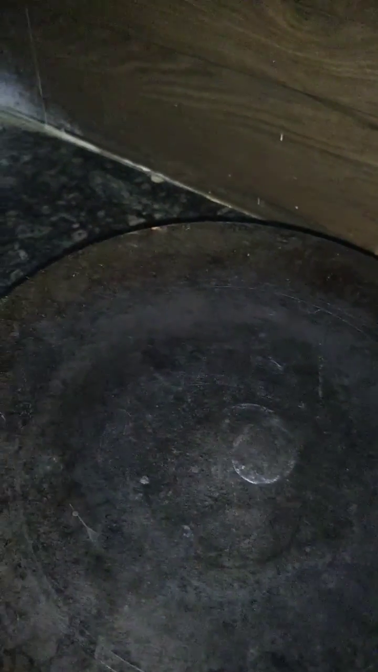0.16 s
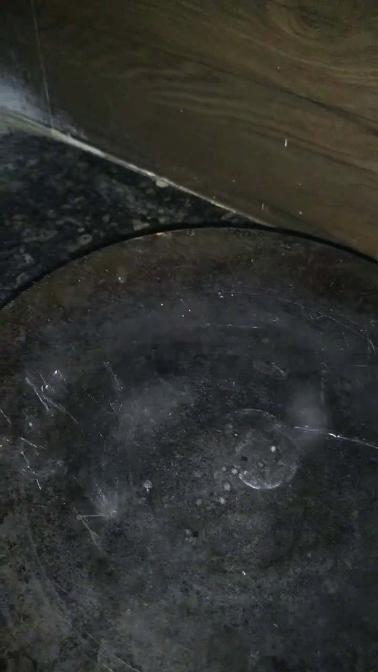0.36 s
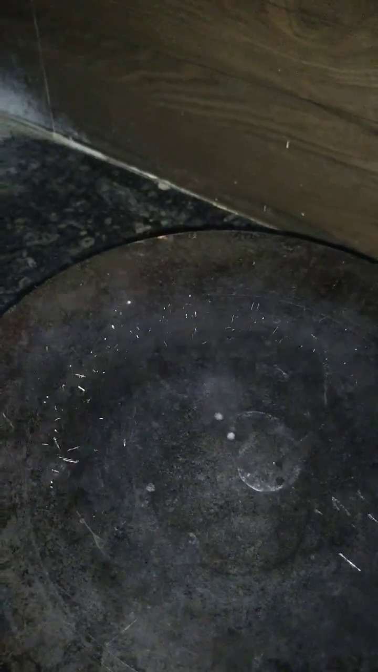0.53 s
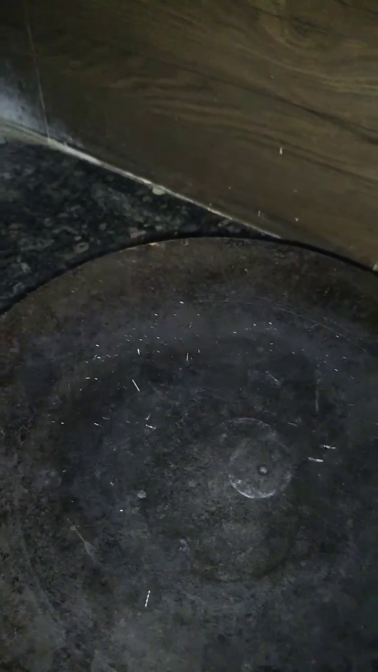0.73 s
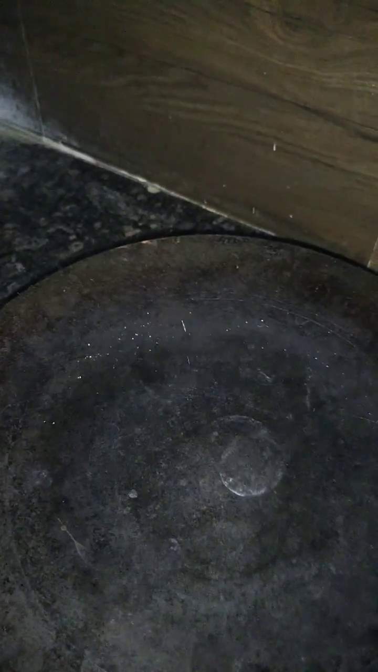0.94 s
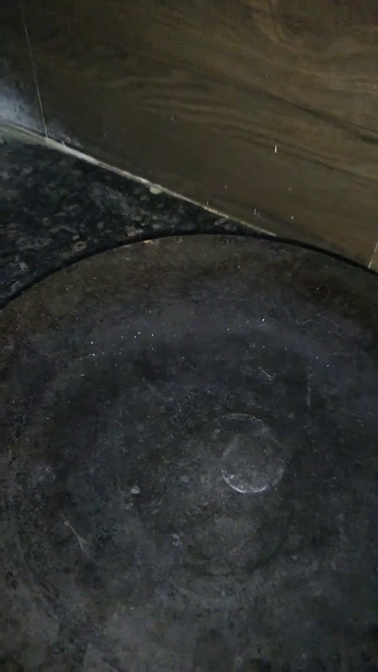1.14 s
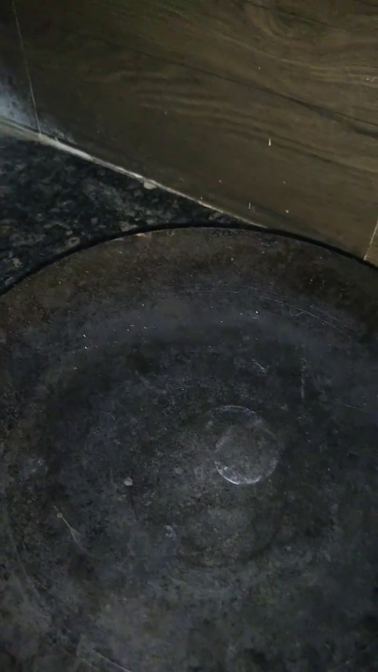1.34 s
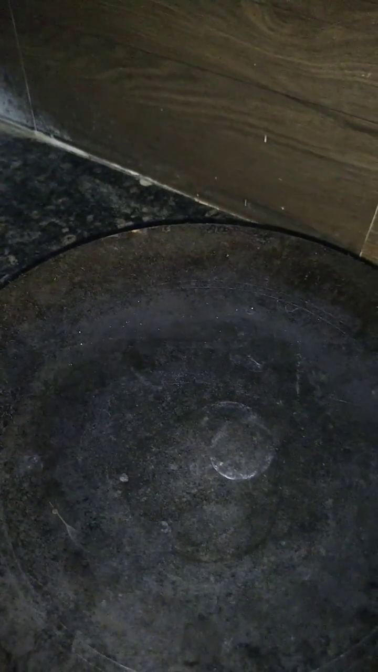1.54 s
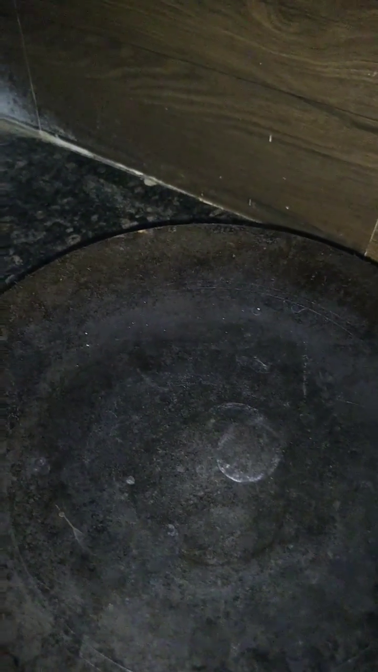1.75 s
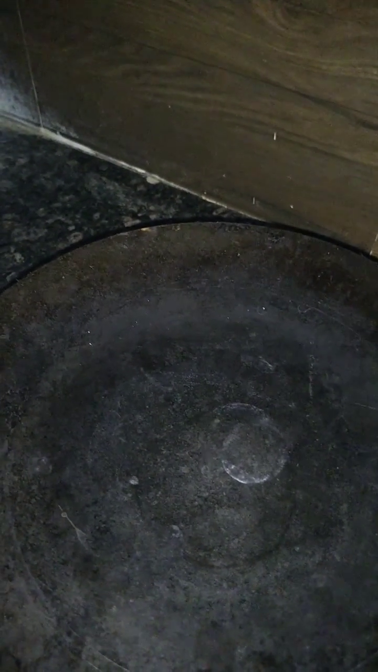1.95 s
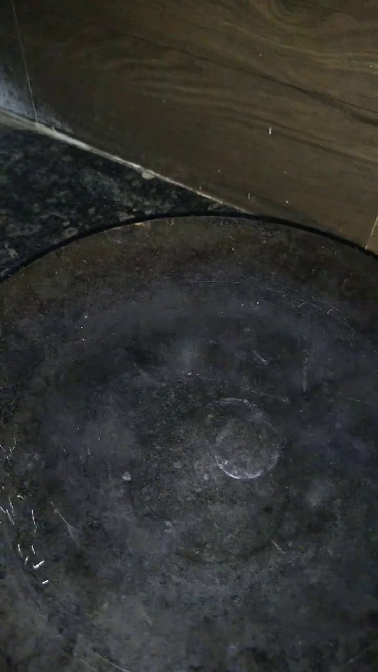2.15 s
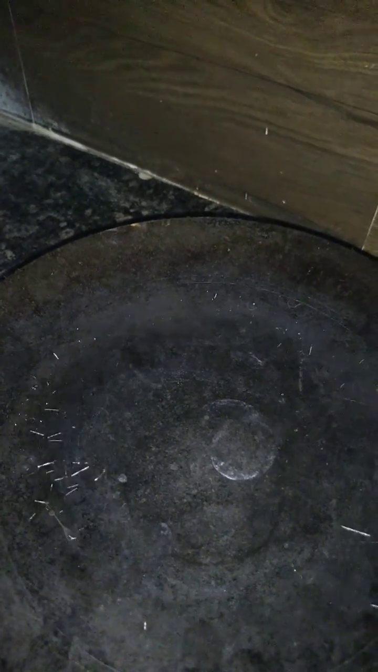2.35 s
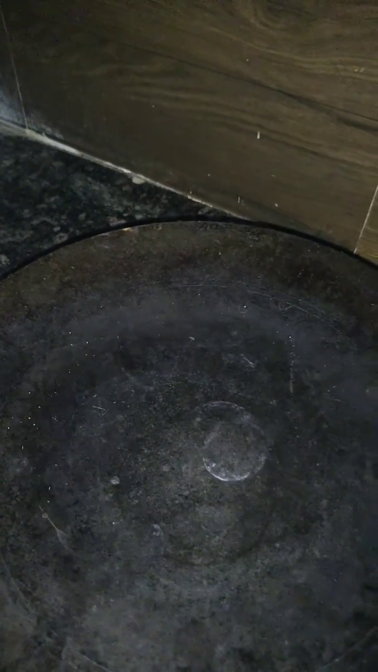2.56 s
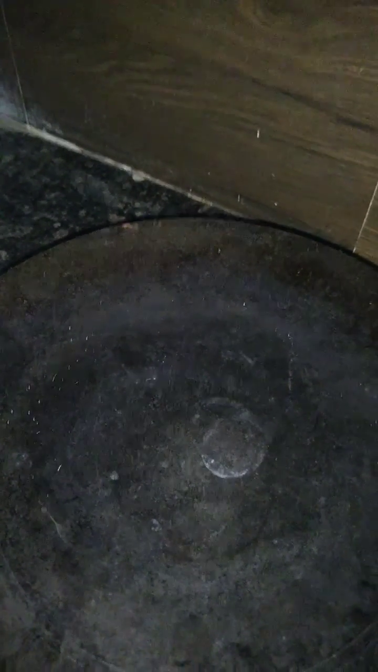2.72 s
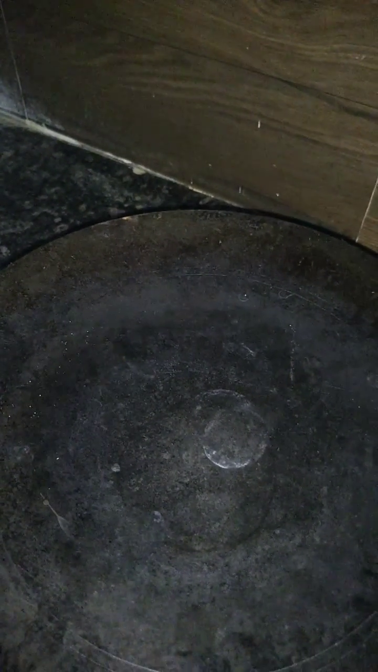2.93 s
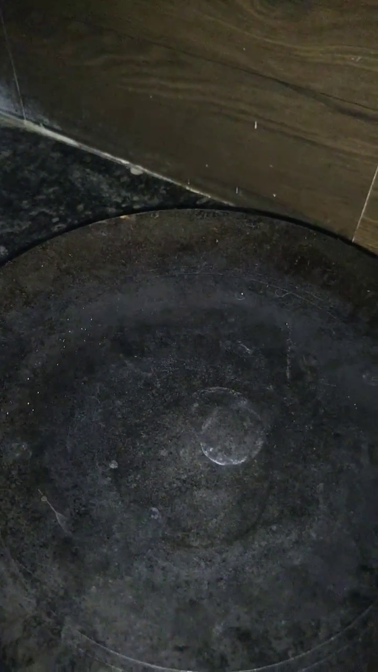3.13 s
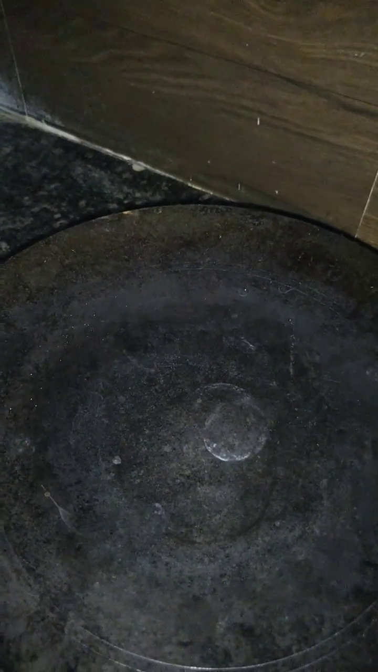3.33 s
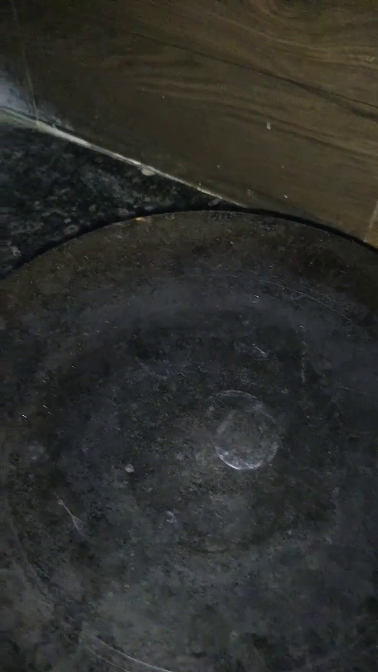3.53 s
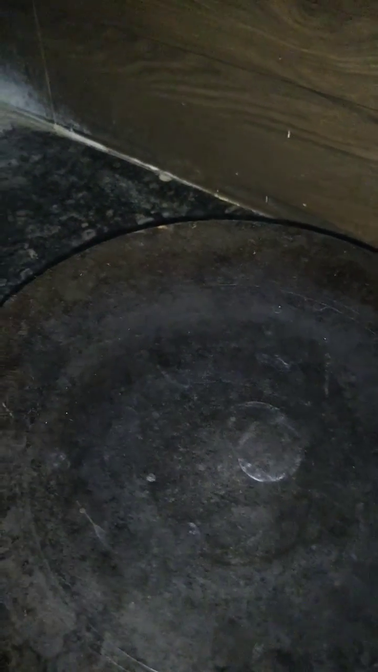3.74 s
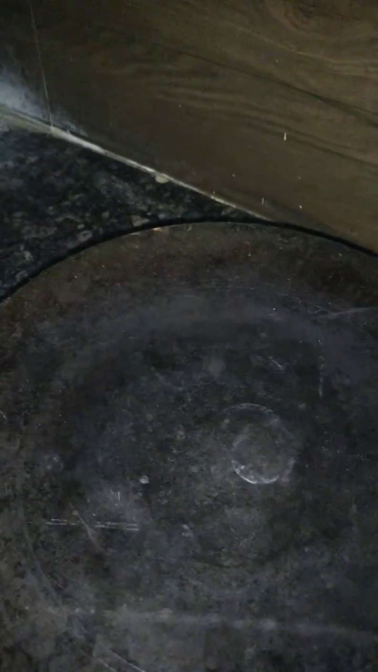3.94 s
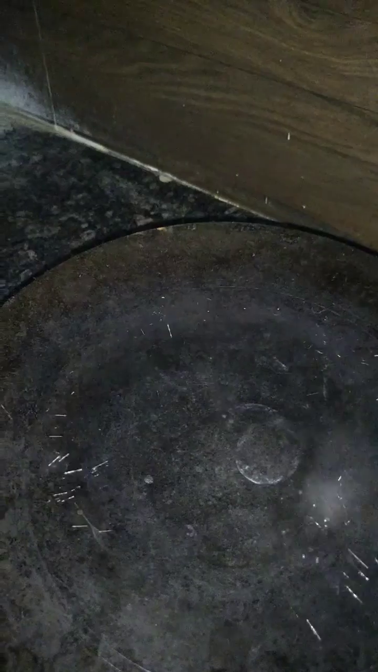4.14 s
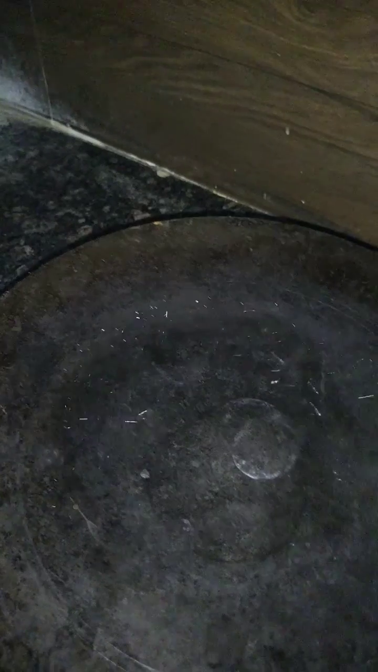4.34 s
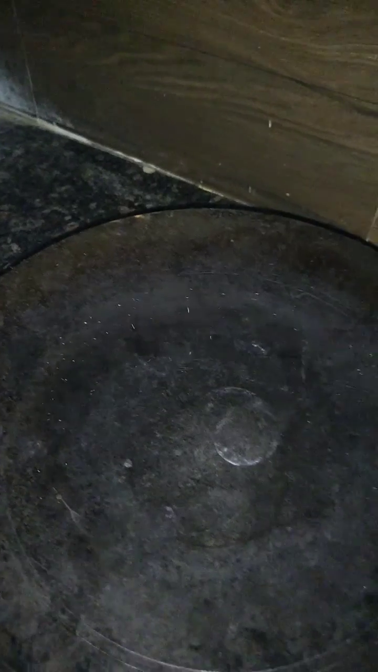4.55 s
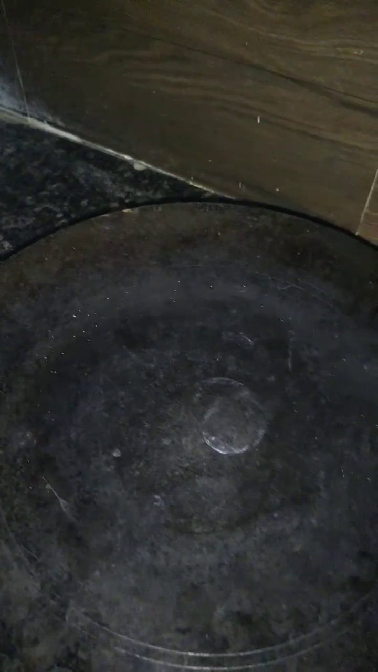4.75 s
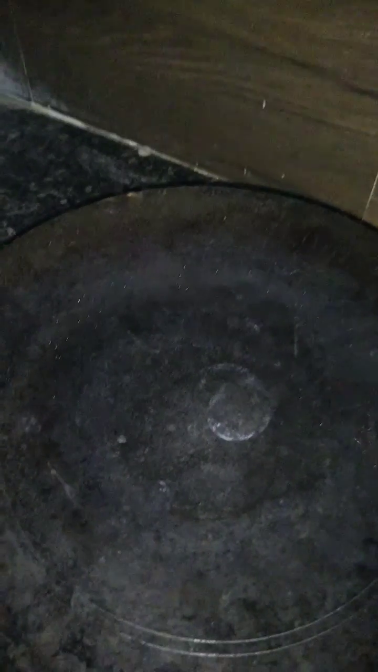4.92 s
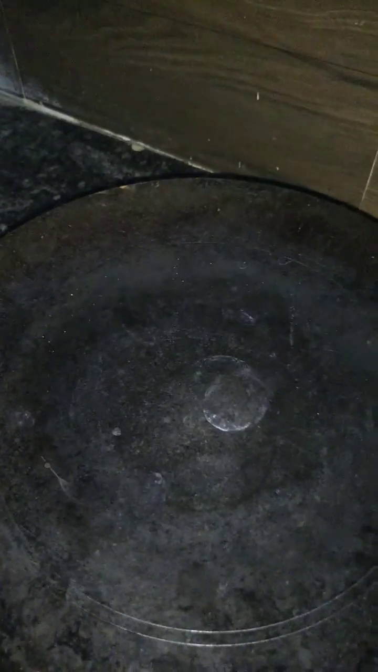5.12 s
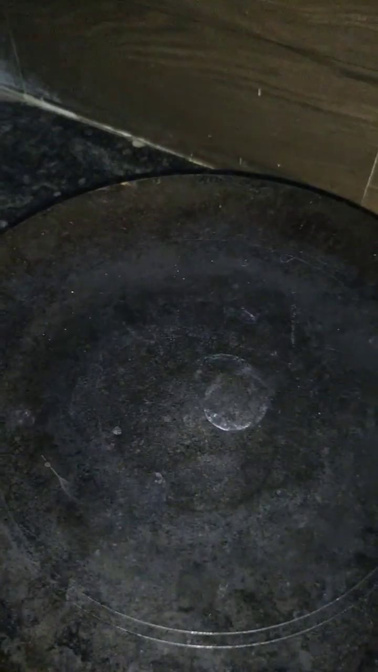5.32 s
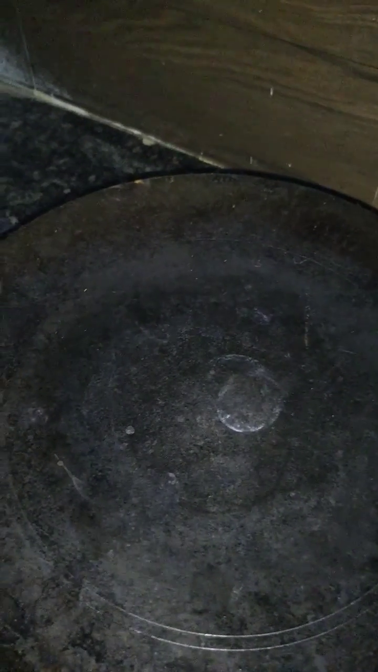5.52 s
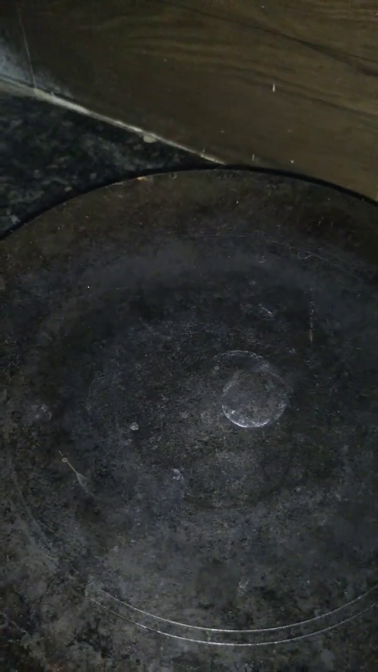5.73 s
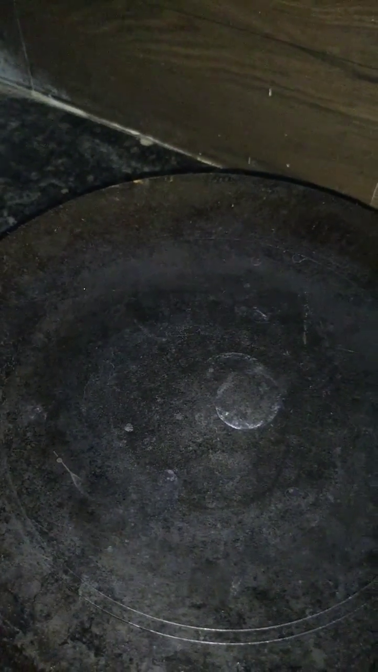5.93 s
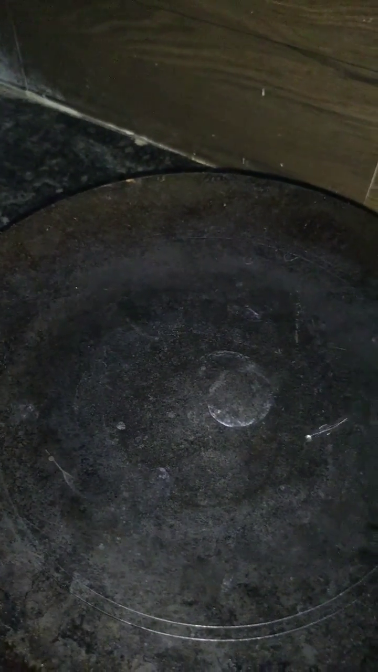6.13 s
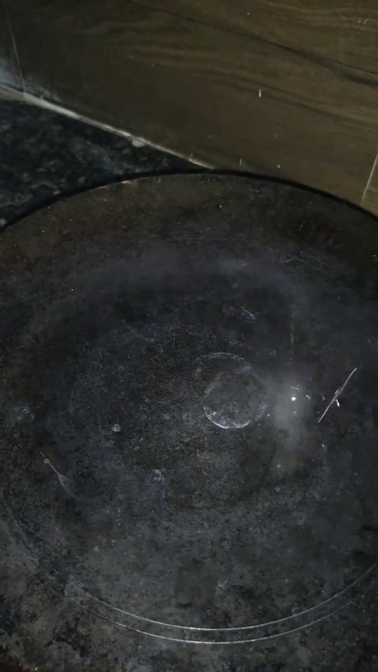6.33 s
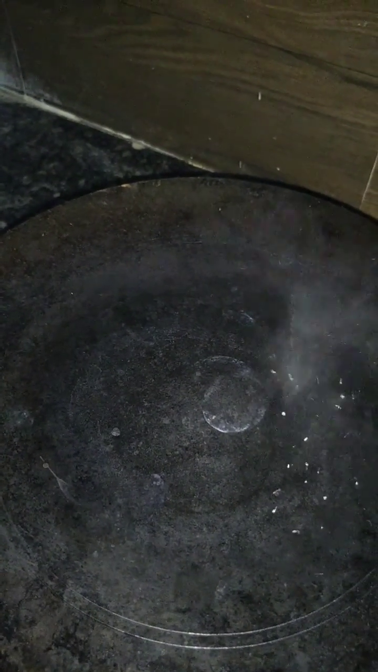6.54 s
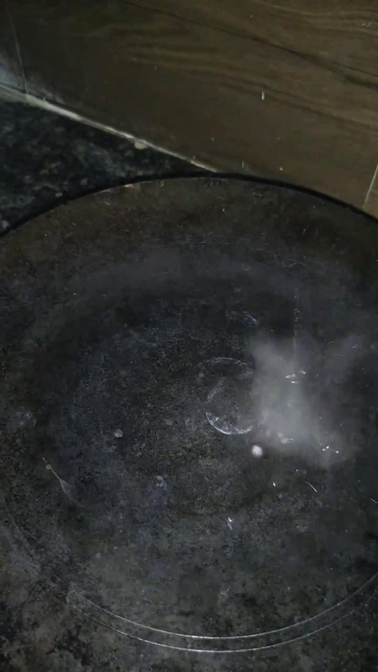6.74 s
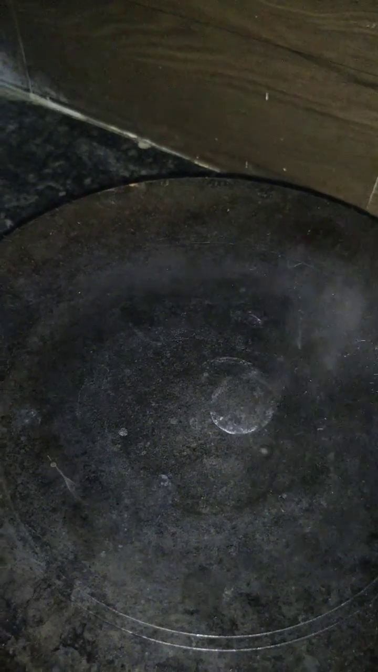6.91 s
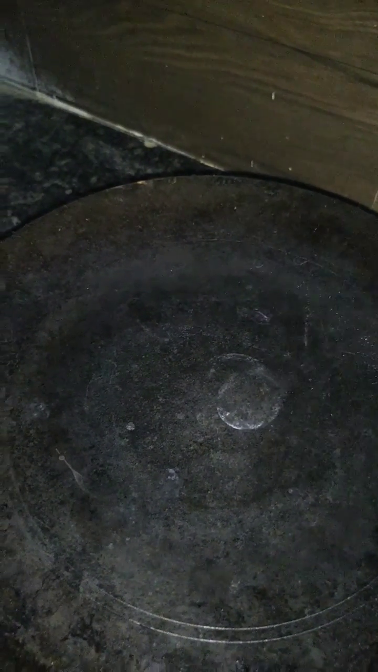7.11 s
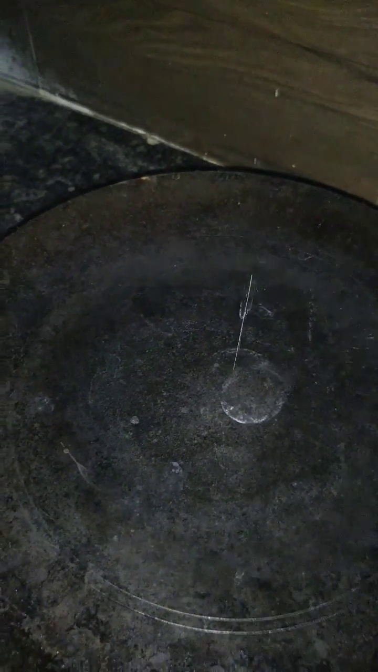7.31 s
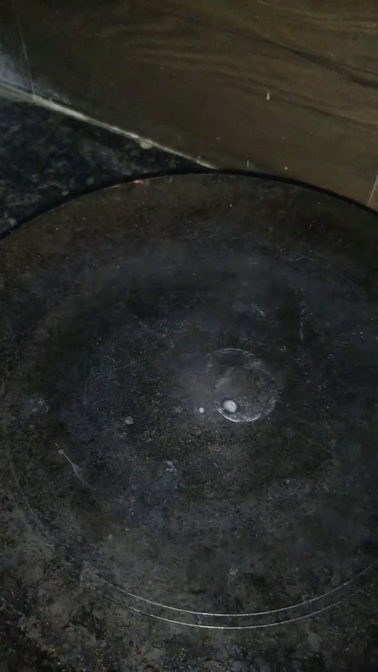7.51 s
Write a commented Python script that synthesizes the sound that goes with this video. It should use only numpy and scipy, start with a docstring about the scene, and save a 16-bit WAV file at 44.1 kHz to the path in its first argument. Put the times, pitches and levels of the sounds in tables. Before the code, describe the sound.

A faint motor hum and soft, dull pats, about six a second, run throughout in a small kitchen. At 0.4 seconds water lands on a very hot flat pan close by with a soft slap and flashes into a sharp, dense sizzle, thinning to single spits by 1.5 seconds. A second, shorter spray hits at 2.2 seconds, flares again at 2.5 and crackles away, with a soft, low boom from the pan at 2.7. A third lands at about 4.1 seconds with another low boom, sizzles strongly and dries to stray ticks after 5 seconds. Between the sizzles the background sinks very low. At 6.3, 6.5 and 6.8 seconds dollops of water drop on the pan, each bursting into a bright, sputtering hiss that fades quickly. A fourth, weaker one sizzles at about 7.5 seconds.

```python
"""A motor hums in a small kitchen and something pats softly about six times a second. Water is flicked
onto a very hot flat pan three times: each spray lands with a soft slap, flashes into a dense sizzle of
tiny steam bursts and thins to single spits as it boils away. Twice the jolted pan booms low. From 6.3 s
four dollops drop and boil on one spot. Between sizzles a noise suppressor turns the kitchen down."""
import sys
import numpy as np
from scipy import signal
from scipy.fft import rfft, irfft, next_fast_len
from scipy.io import wavfile
from scipy.ndimage import map_coordinates

SR = 44100
rng = np.random.default_rng(int(sys.argv[2]) if len(sys.argv) > 2 else 0)


def dump_mix(stems):
    """Bounce the given channels to the path in sys.argv[1] as a 16-bit WAV at rate SR."""
    frames = np.atleast_2d(stems).T  # one column per channel
    limited = np.clip(frames, -1, 1)  # hard clip at full scale
    pcm = np.round(limited * 32767).astype(np.int16)
    wavfile.write(sys.argv[1], SR, pcm)


N = 338247


def amp(db):
    """Gain of a level in dB."""
    return 10 ** (np.asarray(db) / 20)


def unit(x):
    """x at rms 1."""
    return x / np.sqrt(np.mean(x ** 2) + 1e-20)


def along(points, hz):
    """(freq_hz, value) points interpolated on a log axis."""
    freqs_hz, values = np.transpose(points)
    return np.interp(np.log(hz + 1), np.log(freqs_hz + 1), values)


def clock():
    """Sample times in seconds."""
    return np.arange(N) / SR


def wobble(rate_hz):
    """Smooth random curve, rate_hz knots a second."""
    knots = rng.standard_normal(int(N * rate_hz / SR) + 4)
    return map_coordinates(knots, [np.arange(N) * rate_hz / SR])


def filtered(x, response):
    """x through a zero-phase gain, response(hz)."""
    size = next_fast_len(len(x) + SR // 4)
    return irfft(rfft(x, size) * response(np.fft.rfftfreq(size, 1 / SR)), size)[:len(x)]


def coloured(x, spectrum_db):
    """White x given a spectrum, power kept."""
    return filtered(x, lambda hz: unit(amp(spectrum_db(hz))))


def noise(points):
    """Noise of rms 1 with a (freq_hz, level_db) spectrum."""
    return unit(coloured(rng.standard_normal(N), lambda hz: along(points, hz)))


def peak(hz, centre_hz, width_hz):
    """Resonance curve of height 1."""
    return 1 / (1 + (2 * (hz - centre_hz) / width_hz) ** 2)


def band_noise(centre_hz, width_hz):
    """Noise of rms 1 in one resonant band."""
    return unit(filtered(rng.standard_normal(N), lambda hz: peak(hz, centre_hz, width_hz)))


def highpass(x, split_hz):
    """The part of x above split_hz."""
    return filtered(x, lambda hz: 1 - 1 / (1 + (hz / split_hz) ** 8))


def smoothed(x, tau_s):
    """One-pole running mean."""
    keep = np.exp(-1 / (tau_s * SR))
    return signal.lfilter([1 - keep], [1, -keep], x)


def swell(start_s, rise_s, t60_s):
    """Linear rise to 1, exponential decay."""
    age_s = clock() - start_s
    return np.clip(age_s / rise_s, 0, 1) * np.exp(-np.log(1000) * np.maximum(age_s - rise_s, 0) / t60_s)


# freq_hz, level_db
RUSH_SPECTRUM = [(15, -49.5), (25, -22), (69, -5.5), (155, -1), (188, -7.5), (240, -14), (337, -9),
                 (618, -18), (934, -19), (1160, -23), (2080, -20.5), (2930, -26), (6070, -31), (7550, -32),
                 (8320, -46), (10800, -69), (18300, -120)]
def room_rush():
    """The kitchen's steady rush."""
    return amp(-60.5 + 0.82 * wobble(2.5)) * noise(RUSH_SPECTRUM)


# pitch_hz, relative_db, width_hz, drift_db_per_s
HUM_PARTIALS = [(53.7, -85.5, 2.9, 1.5), (75.6, -72.5, 1.3, 2.5), (99.4, -70.5, 0.71, 0),
                (137.4, -72.5, 7.4, -2.5), (157.7, -68, 16, 1.5), (173, -65.5, 8, 0.4),
                (337, -77.5, 13, 2.5), (1980, -93, 4.8, 0.5), (1980, -87, 59, 0.5), (2110, -82, 120, 0.5)]
def motor_hum():
    """A wavering motor hum whose partials slowly trade strength."""
    t, hum = clock(), np.zeros(N)
    for hz, db, width_hz, drift_db_per_s in HUM_PARTIALS:
        phase = 2 * np.pi * hz * t
        in_phase = (1 + 0.53 * wobble(2 * width_hz)) * np.sin(phase)
        quadrature = 0.74 * wobble(2 * width_hz) * np.cos(phase)
        hum += amp(db + drift_db_per_s * (t - t.mean())) * (in_phase + quadrature)
    return amp(3.5 + 1.06 * wobble(3)) * hum


# start_s, level_db
BUMP_EVENTS = [(0.02, -54), (2.18, -47.5), (2.319, -59), (5.84, -53.5), (6.47, -46.5)]
def bumps():
    """Occasional soft swells of rumble."""
    rumble = noise([(20, -23.5), (50, 0.5), (85, 3), (140, -24), (300, -55.5)])
    return rumble * sum(amp(db) * swell(s, rise_s=0.03, t60_s=0.46) for s, db in BUMP_EVENTS)


# freq_hz, level_db
PAT_SPECTRUM = [(150, -24.5), (300, -4.5), (430, 3.5), (620, -6.5), (780, -4), (1100, -13.5), (1800, -13),
                (3000, -27), (8000, -42.5)]
# start_s, beat_s
PAT_STRETCHES = [(0.082, .126), (0.72, .144), (1.433, .159), (2.715, .177), (3.639, .17), (4.633, .153),
                 (5.322, .152), (5.788, .197)]
def pats():
    """Faint, dull pats; the pace changes stretch by stretch."""
    ends_s = [s for s, _ in PAT_STRETCHES[1:]] + [N / SR]
    times_s = np.concatenate([np.arange(s, end_s - beat_s / 2, beat_s)
                              for (s, beat_s), end_s in zip(PAT_STRETCHES, ends_s)])
    envelope = sum(swell(s, rise_s=0.005, t60_s=0.19) for s in times_s)
    return amp(-56.5 + 0.9 * wobble(6)) * envelope * noise(PAT_SPECTRUM)


# pitch_hz, relative_db, t60_s
IRON_MODES = [(1972, -10.5, 0.066), (2462, -2, 0.078), (2610, -7.5, 0.11)]
def iron_ring(kicks):
    """The plate rings briefly after each kick."""
    t = clock()
    ring = sum(amp(db) * swell(0, 0.0015, t60_s) * np.sin(2 * np.pi * hz * t)
               for hz, db, t60_s in IRON_MODES)
    return signal.fftconvolve(kicks, ring)[:N]


# start_s, tick_db, pop_offset_db
SPIT_EVENTS = [(0.377, -38.5, -12.5), (0.423, -41, -4.5), (1.229, -43.5, -11), (1.489, -48, -7),
               (1.511, -47, -11), (1.5637, -47.5, -13), (1.5985, -49.5, -5), (1.687, -53, -6.5),
               (2.1155, -45.5, -6.5), (2.7871, -34, -24), (3.04, -49, -5), (3.2096, -37, -24),
               (3.978, -52.5, -0.5), (4.999, -45.5, -11), (5.218, -47.5, -15.5), (5.304, -52, -6.5),
               (5.488, -47, -12), (5.8, -47.5, -27), (5.8275, -49.5, -16), (7.3607, -43.5, -12)]
def spits():
    """Stray droplets burst singly: a high tick and a lower pop that rings the iron."""
    pop, tick, kicks = np.zeros((3, N))
    for start_s, tick_db, pop_offset_db in SPIT_EVENTS:
        pop_gain = amp(tick_db + pop_offset_db)
        pop += pop_gain * swell(start_s, rise_s=0.00079, t60_s=0.028)
        tick += amp(tick_db) * swell(start_s, rise_s=0.0005, t60_s=0.016)
        kicks[round(start_s * SR)] += pop_gain
    pop_noise = noise([(700, -43), (1600, -8), (2200, -2.5), (3600, -2.5), (8000, -30)])
    tick_noise = noise([(1500, -41.5), (3600, -8.5), (6000, -3.5), (7600, 1), (9000, -2.5)])
    return amp(1) * pop * pop_noise + tick * tick_noise + amp(-6.5) * iron_ring(kicks)


def boiling(splashes):
    """Boil strength and brightness: a splash flashes to steam, sags while its water lasts, then dries."""
    t, power, bright_db = clock(), np.zeros(N), np.zeros(N)
    sag_db_per_s = 14
    for start_s, boil_db, flash_db, rise_s, hold_s, drying_db_per_s, tone_db in splashes:
        age_s = np.maximum(t - start_s, 0)
        loss_db = sag_db_per_s * np.minimum(age_s, hold_s)
        loss_db += drying_db_per_s * np.maximum(age_s - hold_s, 0)
        flash = amp(flash_db) * swell(start_s, rise_s=0.0043, t60_s=0.2)
        power += np.minimum(age_s / rise_s, 1) * amp(boil_db - loss_db) ** 2 + flash ** 2
        bright_db[t >= start_s] = tone_db
    return np.sqrt(power), bright_db


def steam_bursts(rate_hz, spread_db, life_s):
    """Tiny puffs of steam, random in time and size; mean power 1."""
    energy = amp(spread_db * np.clip(rng.standard_normal(N), -2, 2)) ** 2
    chance = np.minimum(rate_hz / SR, 1)
    puffs = (rng.random(N) < chance) * energy / energy.mean() / chance
    return np.sqrt(smoothed(puffs, life_s)) * rng.standard_normal(N)


def sputter(boil, rate_hz=320, pitch_hz=2406, decay_cycles=5.7, spread_db=2.5):
    """Bigger drops burst as short pitched pops that kick the plate; same rms as boil."""
    onsets = np.flatnonzero((rng.random(N) < rate_hz / SR) & (boil > amp(-80)))
    detune, size = rng.standard_normal((len(onsets), 2)).T
    hz = np.clip(pitch_hz * np.exp(0.11 * detune), 1900, 7500)[:, None]
    gain = boil[onsets] * amp(spread_db * np.clip(size, -2, 1.5))
    age_samples = np.arange(SR // 50)
    cycles = hz * age_samples / SR
    grains = gain[:, None] * np.sin(2 * np.pi * cycles) * np.exp(-cycles / decay_cycles)
    pops = np.bincount((onsets[:, None] + age_samples).ravel(), grains.ravel(), N)[:N]
    ring = amp(-12.5) * iron_ring(np.bincount(onsets, gain, N))
    return unit(pops + ring) * np.sqrt(np.mean(boil ** 2))


# freq_hz, level_db
STEAM_SPECTRUM = [(53, -41.5), (90, -15), (168, -1), (236, -23.5), (450, -9), (645, -12.5), (1230, -16.5),
                  (1480, -9.5), (2170, -5), (3110, -2), (3830, 0), (4800, -6.5), (7290, -8.5), (7710, -9.5),
                  (8320, -6), (10800, -72), (18300, -120)]
def sizzle(steady_boil, bright_db, ridges, boil_rate_hz, flutter_db, coarse_db, fine_db):
    """More boiling gives denser bursts; on drying, the hiss breaks up into crackle."""
    def spectrum_db(hz):
        ridges_db = sum(db * peak(hz, centre_hz, width_hz) for centre_hz, width_hz, db in ridges)
        return along(STEAM_SPECTRUM, hz) + ridges_db

    boil = steady_boil * amp(flutter_db * wobble(35))
    rate_hz = 110 + boil_rate_hz * (boil / boil.max()) ** 1.3
    crackle = steam_bursts(rate_hz, spread_db=3.5, life_s=0.0028)
    steam = amp(-1.22) * crackle + amp(-9.5) * rng.standard_normal(N)
    hiss = coloured(boil * steam, spectrum_db)
    fine = highpass(hiss, split_hz=4150)  # small bubbles
    return amp(coarse_db) * (hiss - fine) + amp(bright_db + fine_db) * fine + amp(-12.5) * sputter(boil)


# start_s, boil_db, flash_db, rise_s, hold_s, drying_db_per_s, tone_db
SPRAY_SPLASHES = [(0.427, -36, -47.5, 0.045, 0.55, 46.5, -7), (2.164, -36, -40.5, 0.034, 0.18, 51.5, -6),
                  (4.058, -34.5, -39, 0.15, 0.46, 44.5, -5.5)]
# centre_hz, width_hz, gain_db
SPRAY_COLOUR = [(1518, 55, 6), (2183, 160, 5.5), (2590, 86, 5.5), (3700, 900, 1), (7120, 200, 6)]
def sprays():
    """Flicked water boils, scattered over the pan."""
    boil, bright_db = boiling(SPRAY_SPLASHES)
    return sizzle(np.hypot(boil, surges()), bright_db, SPRAY_COLOUR,
                  boil_rate_hz=6000, flutter_db=0.93, coarse_db=-1.06, fine_db=7.5)


# start_s, level_db, rise_s, t60_s
SLAP_EVENTS = [(0.433, -40, 0.037, 0.13), (2.163, -41, 0.024, 0.21), (4.058, -45, .012, 0.37),
               (6.482, -52.5, .008, .35), (6.788, -53, 0.011, 0.39)]
# freq_hz, level_db
SLAP_SPECTRUM = [(30, -37), (70, -9), (150, -6.5), (260, -16), (430, -7.5), (650, -19), (1000, -41.5),
                 (2500, -60)]
def slaps():
    """The water's weight lands on the plate with a dull splat."""
    envelope = sum(amp(db) * swell(s, rise_s, t60_s) for s, db, rise_s, t60_s in SLAP_EVENTS)
    return envelope * noise(SLAP_SPECTRUM)


# start_s, boil_db, t60_s
SURGE_EVENTS = [(0.544, -32, .25), (0.888, -49.5, 0.17), (1.079, -47.5, 0.14), (2.524, -43.5, 1.6),
                (2.749, -52.5, 0.2), (2.866, -52, 0.21), (4.15, -41, 0.17), (4.48, -42.5, 0.15),
                (4.867, -44.5, .1), (7.439, -54.5, 0.075)]
def surges(rise_s=0.0051):
    """Extra boil strength where a skating drop touches the iron again."""
    return sum(amp(db) * swell(s, rise_s, t60_s) for s, db, t60_s in SURGE_EVENTS)


# start_s, level_db, pitch_hz, width_hz, t60_s
FLARE_EVENTS = [(0.699, -42, 2560, 300, 0.2), (2.53, -42, 2370, 600, 0.16), (4.155, -44.5, 2330, 704, 0.84),
                (4.433, -39.5, 2280, 500, 0.074), (6.272, -42, 5320, 101, 0.062),
                (6.272, -38.5, 2700, 352, 0.19), (6.482, -41, 2500, 299, 0.24),
                (6.798, -38.5, 2160, 130, 0.24)]
def flares(rise_s=0.0071):
    """A jet of steam from under a big drop sounds in one narrow band."""
    return sum(amp(db) * swell(s, rise_s, t60_s) * band_noise(hz, width_hz)
               for s, db, hz, width_hz, t60_s in FLARE_EVENTS)


def last_specks():
    """Specks of water tick on for a second or two after each spray dries."""
    lingering = sum(swell(s + 0.65, rise_s=0.17, t60_s=3.3) for s, *_ in SPRAY_SPLASHES)
    puffs = steam_bursts(rate_hz=26, spread_db=3, life_s=0.0022)
    ticks = coloured(puffs, lambda hz: along([(1200, -26.5), (3000, 3), (7500, -6)], hz))
    return amp(-63.5) * lingering * ticks


# start_s, level_db, t60_s
BOOM_EVENTS = [(2.745, -52.5, 0.49), (4.06, -45, 0.54)]
def booms(rise_s=0.02):
    """The whole pan answers a jolt with one low, broad resonance."""
    body = band_noise(centre_hz=170, width_hz=31)
    return body * sum(amp(db) * swell(s, rise_s, t60_s) for s, db, t60_s in BOOM_EVENTS)


# start_s, boil_db, flash_db, rise_s, hold_s, drying_db_per_s, tone_db
DOLLOP_SPLASHES = [(6.269, -39, -40.5, 0.012, 0.17, 60, -5.5), (6.479, -36, -30, 0.0091, 0.12, 31.5, -6.5),
                   (6.783, -36, -29, 0.015, 0.14, 79.5, -7),
                   (7.461, -44.5, -55.5, 0.0095, 0.33, 52.5, -6.5)]
# centre_hz, width_hz, gain_db
DOLLOP_COLOUR = [(1640, 200, 3.5), (1850, 115, -8), (2156, 76, 4), (2406, 63, 7.5), (3240, 69, 2.5),
                 (3630, 170, 1.5), (4400, 71, 1.5), (4420, 140, -1.5), (4920, 60, 4), (5140, 60, 0),
                 (5730, 540, -2.5), (6600, 230, 4.5), (7940, 400, -8.5)]
def dollops():
    """Dropped water boils on one spot: denser bursts, deeper spectral ridges and troughs."""
    boil, bright_db = boiling(DOLLOP_SPLASHES)
    return sizzle(boil, bright_db, DOLLOP_COLOUR,
                  boil_rate_hz=16000, flutter_db=1.6, coarse_db=-1.64, fine_db=7)


# freq_hz, t60_s
ROOM_DECAY = [(150, 0.95), (2000, 0.11), (8000, 0.52)]
def walls(x):
    """Short reverberation of a small hard room, 4 ms late."""
    hz, t, spectra = signal.stft(rng.standard_normal(SR // 2), SR, nperseg=256)
    decay = np.exp(-np.log(1000) * t / along(ROOM_DECAY, hz)[:, None])
    tail = signal.istft(spectra * decay, SR, nperseg=256)[1]
    return signal.fftconvolve(np.pad(x, (SR // 250, 0)), tail / np.linalg.norm(tail))[:N]


def scene():
    """The pan close by, the kitchen behind it; mono."""
    kitchen = room_rush() + motor_hum() + bumps() + pats()
    pan = spits() + sprays() + slaps() + flares() + last_specks() + booms() + dollops()
    return (kitchen + pan + amp(-9) * walls(pan))[None]


def suppressor(x, depth_db=6, shut_db=-60.5, open_db=-45):
    """Turns everything down when the treble falls quiet."""
    treble_power = smoothed(highpass(x, split_hz=2500) ** 2, tau_s=0.017)
    treble_db = 10 * np.log10(treble_power + 1e-20)
    return x * amp(np.interp(treble_db, [shut_db, open_db], [-depth_db, 0]))


# freq_hz, gain_db
BAND_LIMIT = [(7400, 0), (7700, -3.5), (8000, -14), (8450, -33), (8650, -70), (8750, -120)]
def record(dry):
    """Microphone bass cut, noise suppressor, steep roll-off near 8 kHz."""
    gated = suppressor(highpass(dry[0], split_hz=34))
    return filtered(gated, lambda hz: amp(along(BAND_LIMIT, hz)))[None]


dry = scene()
out = record(dry)
dump_mix(out)
```